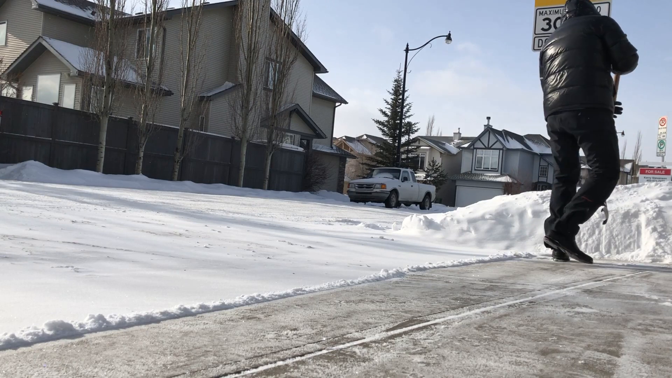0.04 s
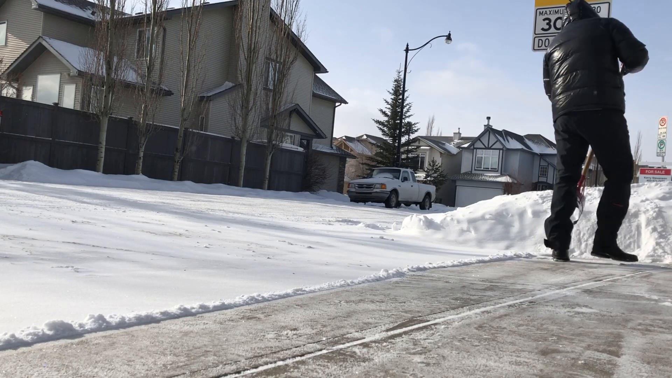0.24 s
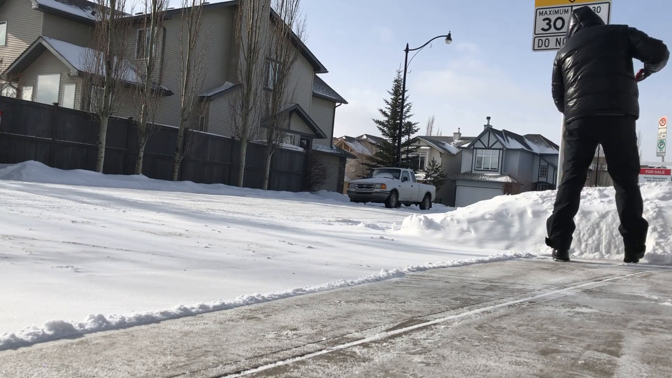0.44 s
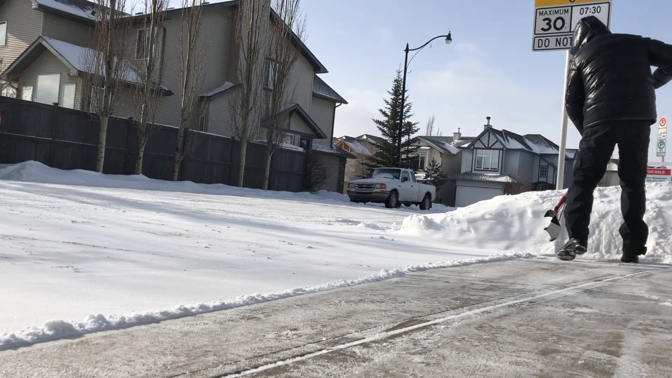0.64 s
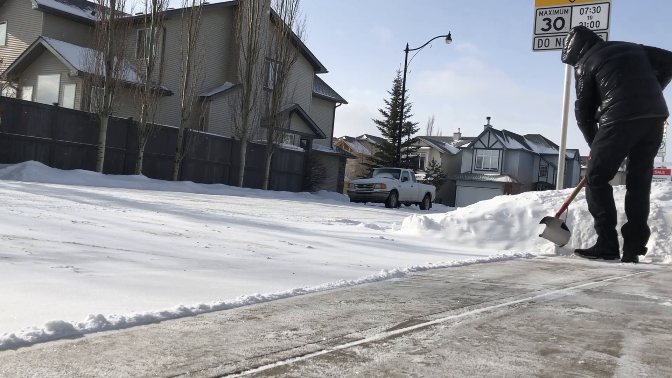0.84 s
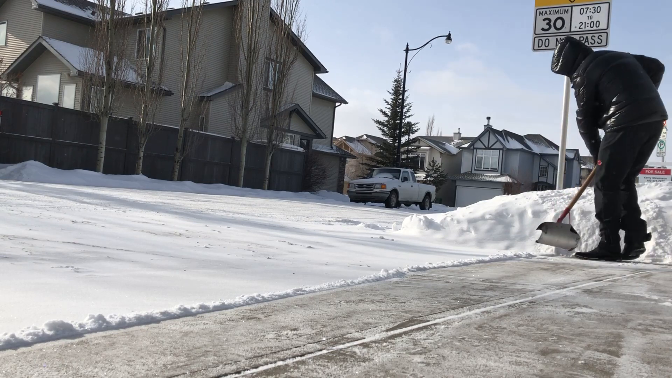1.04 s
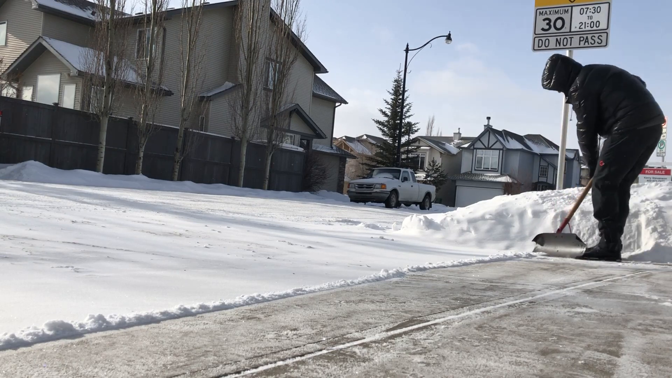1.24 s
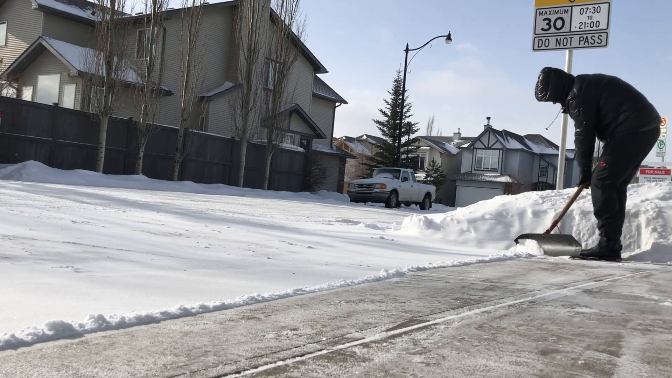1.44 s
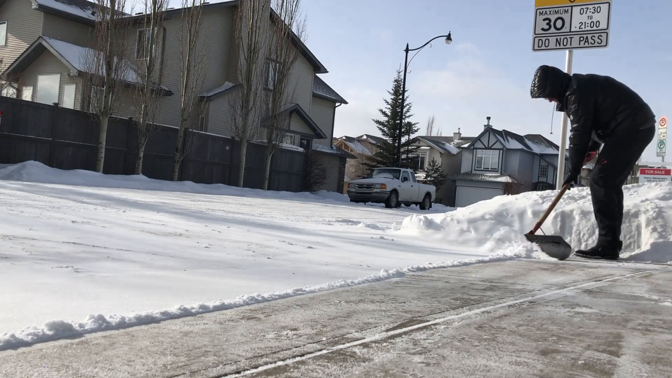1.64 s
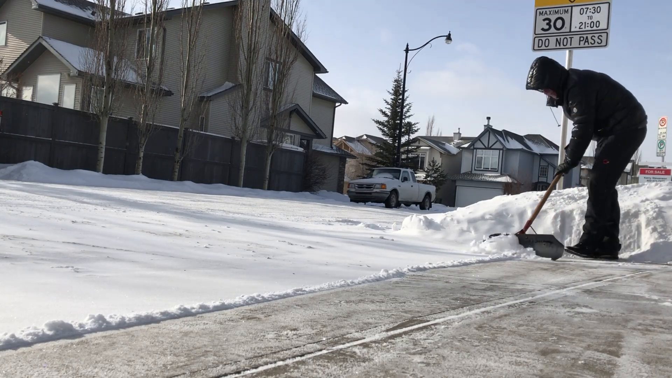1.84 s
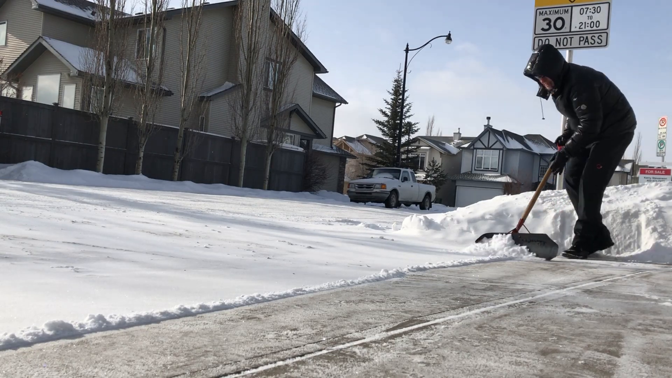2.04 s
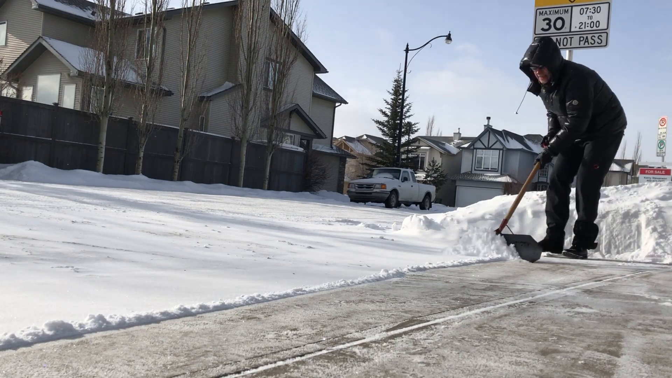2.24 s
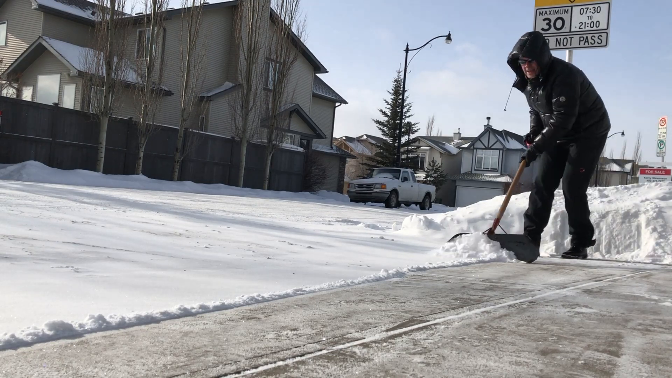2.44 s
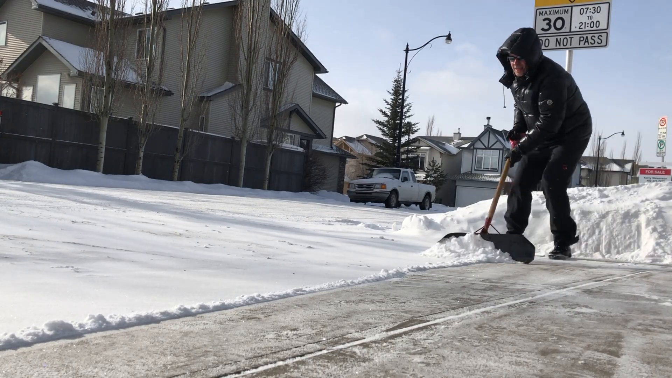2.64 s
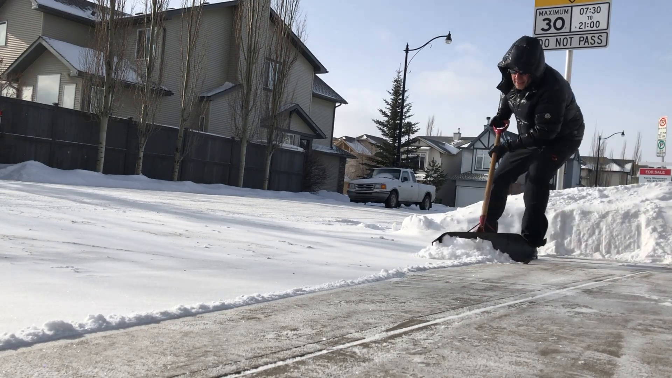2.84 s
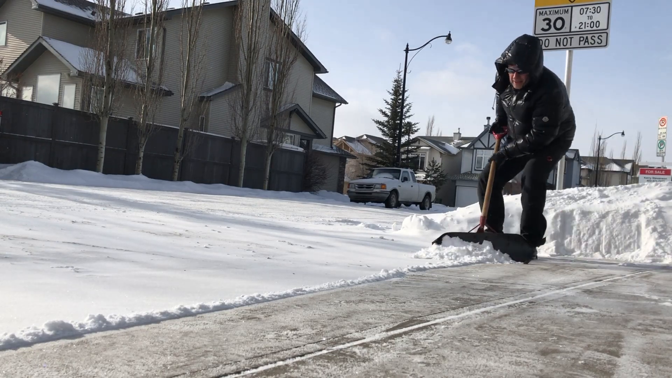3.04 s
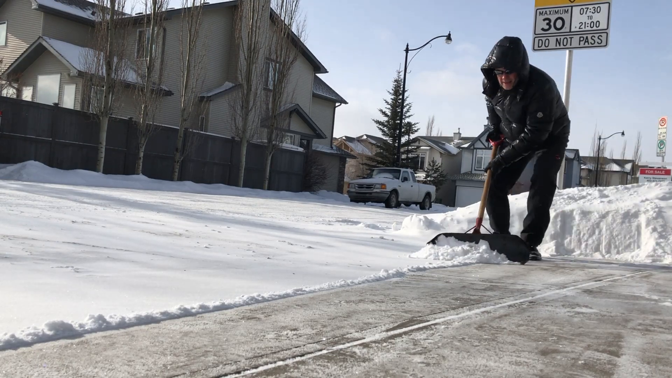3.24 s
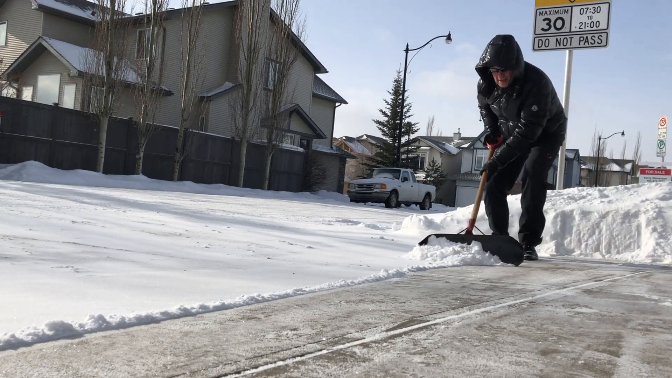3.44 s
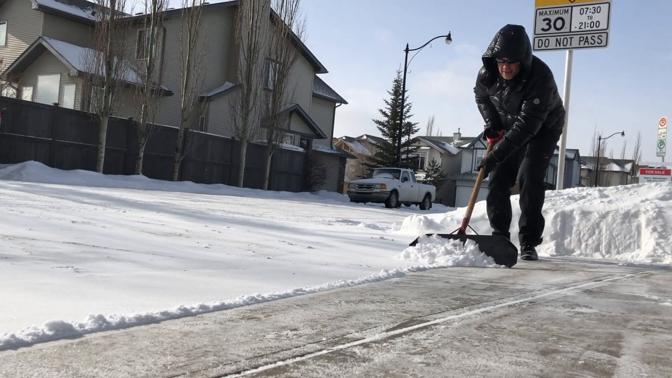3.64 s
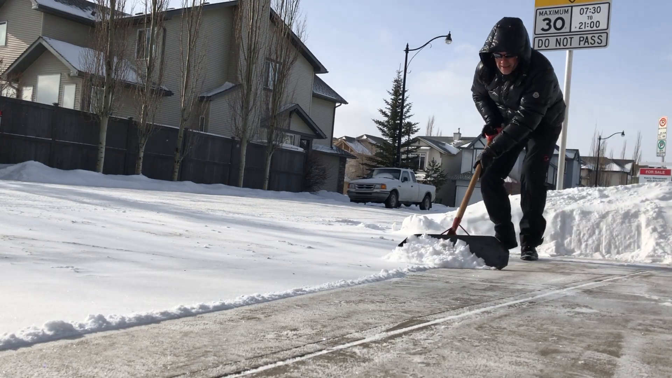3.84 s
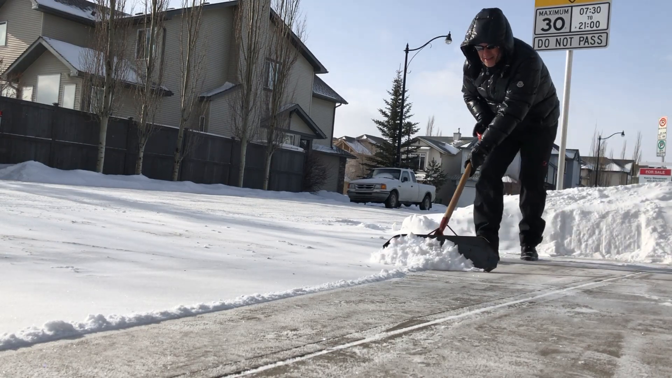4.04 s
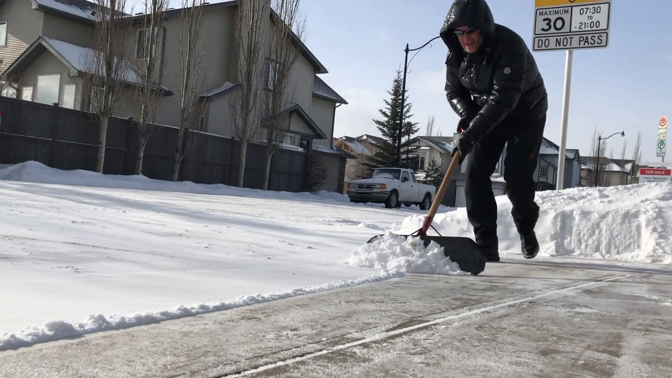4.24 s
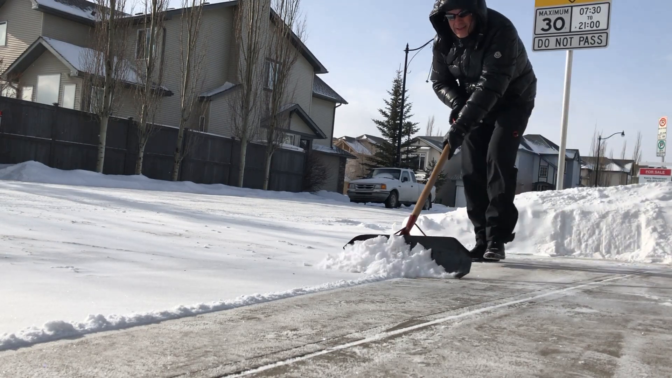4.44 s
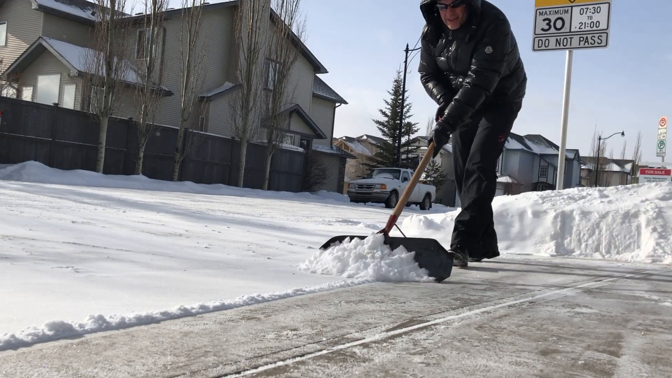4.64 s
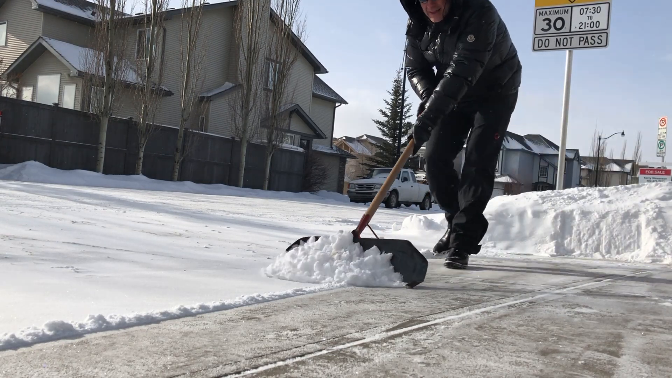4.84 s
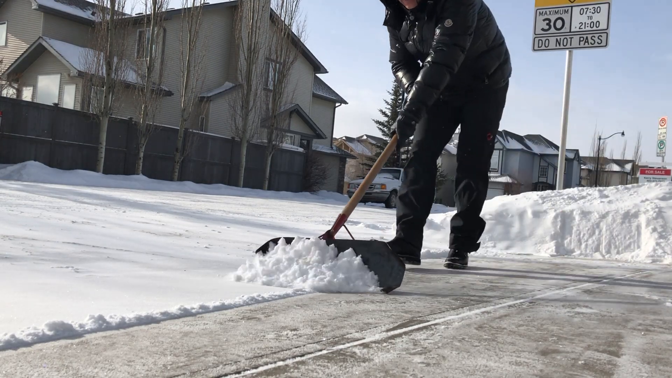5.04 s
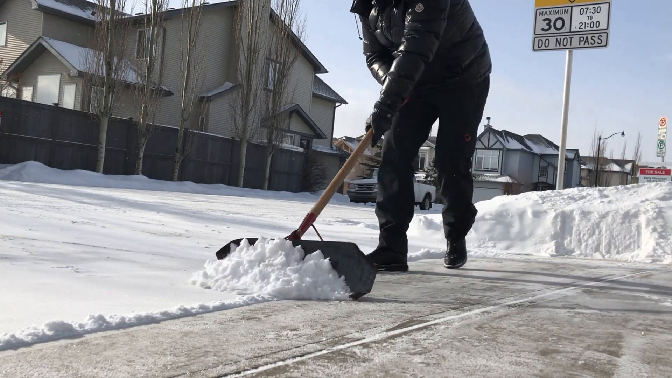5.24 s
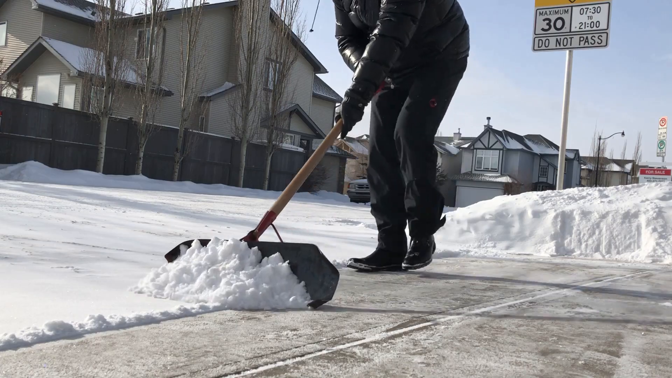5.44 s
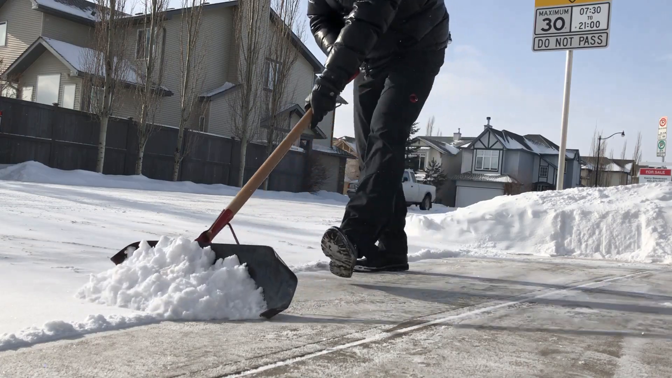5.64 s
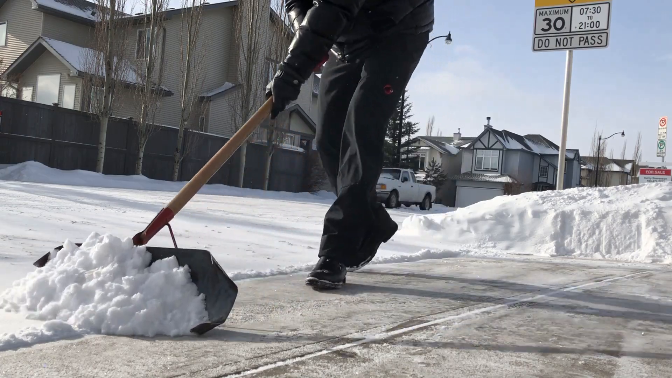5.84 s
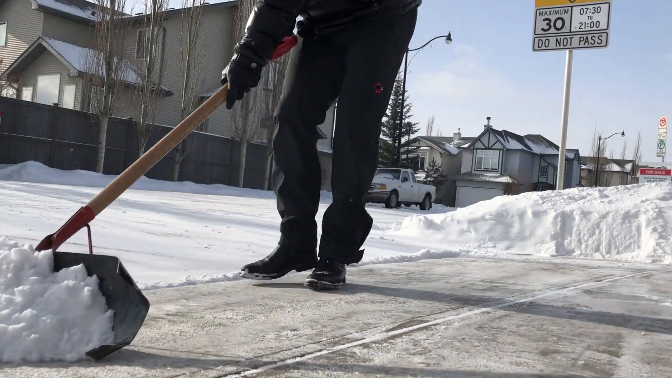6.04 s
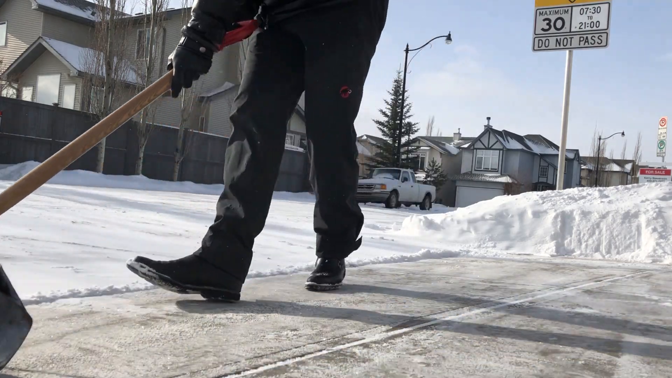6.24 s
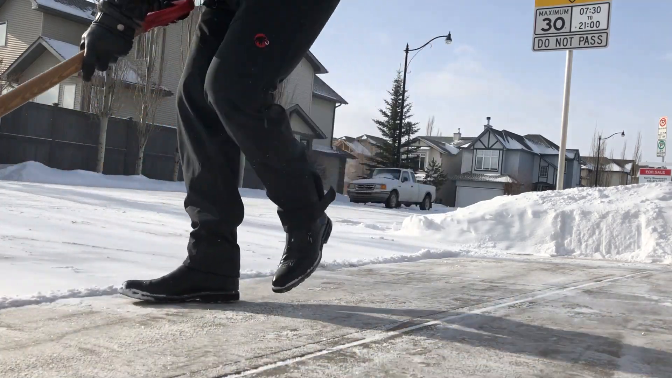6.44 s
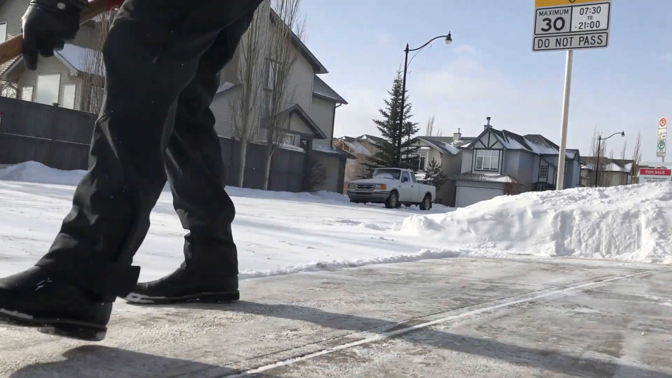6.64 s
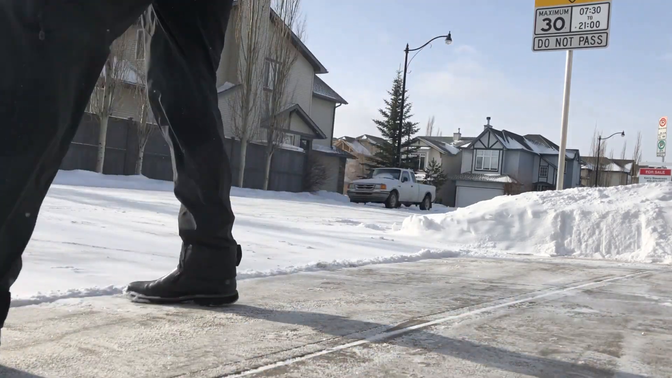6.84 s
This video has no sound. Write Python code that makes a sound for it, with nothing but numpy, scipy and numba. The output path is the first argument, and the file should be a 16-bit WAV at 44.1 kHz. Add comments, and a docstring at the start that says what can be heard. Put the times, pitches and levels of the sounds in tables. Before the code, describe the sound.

A quiet residential street with a very faint low rumble. From 0 to 1.3 seconds, soft boot thuds, brushing snow scuffs and small dry ice ticks. At about 1.4 the shovel is set down with an abrupt scrape and a short, unsteady hollow ring, then rasps over ice, catching on ridges and fading by 2.2. A second, duller push runs from 2.2 to 2.9. A brief break follows, with heavier boot thuds and scuffs around 3.0 to 3.2. From 3.2 a long, juddering, gritty scrape builds, loaded with droning snow; grit snaps at 4.1 and a hard, ringing knock strikes at 4.57. Another push starts near 5.1, growing closer and brighter. At 6.15 a sharp fizzing skid sounds as the blade passes the low microphone. After rough catches and small knocks around 6.65, quickening hops end near 6.9. House fronts return a weak, dull echo.

```python
"""A snow shovel is set down on an icy sidewalk and pushed towards a low microphone, with one short pause.
Its edge sticks and slips on ice and grit: juddering noise that rings the scoop, rasps and fizzes.
It catches on ridges (short noise spells), skids on concrete (gliding resonances), knocks into a joint
(ringing modes) and ends in quickening hops. Boots thud and scuff, ice crumbs tick,
and house fronts return a faint echo over the filtered-noise rumble of a quiet suburb."""
import sys
import numpy as np
from scipy import signal
from scipy.fft import rfft, irfft
from scipy.io import wavfile
from numba import njit

SR = 44100
rng = np.random.default_rng(int(sys.argv[2]) if len(sys.argv) > 2 else 0)


def persist_wave(psi):
    """Save psi, clipped to +-1, as 16-bit WAV."""
    counts = np.round(np.clip(psi, -1, 1) * 32767).astype(np.int16)
    wavfile.write(sys.argv[1], SR, np.atleast_2d(counts).T)


N = 304686
T = np.arange(N) / SR  # time of every sample [s]
TOP_HZ = 15950  # upper limit of the sound


def undb(db):
    """Turn decibels into a gain."""
    return 10 ** (np.asarray(db) / 20)


def unit(x):
    """Scale a signal to a standard deviation of 1."""
    return x / np.std(x)


def curve(rows):
    """Join (time [s], value) points by straight lines."""
    return np.interp(T, *np.transpose(rows))


def swell(start, length):
    """A smooth rise and fall between 0 and 1."""
    return np.sin(np.pi * np.clip((T - start) / length, 0, 1))


def walk(rate):
    """Smooth chance: straight lines between random points, `rate` points a second, spread near 1."""
    knots = rng.standard_normal(8192)
    return 1.2 * np.interp(T * rate, np.arange(len(knots)), knots)


def colour(x, points, size=2048):
    """Filter through (frequency [Hz], level [dB]) points, without echo ahead; white noise keeps its power."""
    hz, db = np.transpose(points)
    f = np.maximum(np.fft.rfftfreq(2 * size, 1 / SR), 1)
    log_gain = np.log(undb(np.interp(np.log(f), np.log(hz), db)))
    # folding the cepstrum forward makes the filter respond as early as it can
    cepstrum = irfft(log_gain)
    cepstrum[1:size] *= 2
    cepstrum[size + 1:] = 0
    response = irfft(np.exp(rfft(cepstrum)))[:size]
    return signal.oaconvolve(x, response / np.linalg.norm(response))[:N]


def resonate(x, hz, width):
    """A fixed resonance, gain 1 at its centre."""
    return signal.lfilter(*signal.iirpeak(hz, hz / width, fs=SR), x)


@njit
def sweep(x, hz, width):
    """State-variable filter with a moving centre: low-pass and band-pass outputs."""
    low, band = np.empty(len(x)), np.empty(len(x))
    band_state, low_state = 0., 0.
    for i in range(len(x)):
        g = np.tan(np.pi * min(hz[i], .45 * SR) / SR)
        k = width / hz[i]
        v = (band_state + g * (x[i] - low_state)) / (1 + g * (g + k))
        low[i] = low_state + g * v
        band[i] = k * v
        band_state = 2 * v - band_state
        low_state = 2 * low[i] - low_state
    return low, band


def grit(rate, spread_db, smooth):
    """Tiny fractures of very unequal size, `rate` a second, over a smooth rub; spread 1."""
    size = undb(spread_db * np.minimum(rng.exponential(size=N), 5))
    cracks = (rng.random(N) < rate / SR) * size * rng.choice([-1, 1], N)
    return unit(unit(cracks) + smooth * rng.standard_normal(N))


def slips(rate=110, relax=0.0018):
    """An edge or sole lets go at uneven moments: each slip jumps up and dies away; spread near 1."""
    jumps = (rng.random(N) < rate / SR) * rng.uniform(0.55, 1, N)
    surge = signal.lfilter([1], [1, -np.exp(-1 / (relax * SR))], jumps)
    return np.minimum(unit(surge - surge.mean()), 3)


def shimmer(x, ring=0.0045, depth=0.5, count=3, size=768):
    """The blade's crowded upper modes colour the sound; the mix shifts as the contact point moves."""
    out = x
    for _ in range(count):
        modes = rng.standard_normal(size) * np.exp(-T[:size] / ring)
        rung = signal.oaconvolve(x, modes / np.linalg.norm(modes))[:N]
        out = out + depth * np.tanh(walk(12)) * rung
    return unit(out) * np.std(x)


# tone of the distant streets: (frequency [Hz], relative level [dB])
SUBURB_TONE = [(25, -33), (45, -2), (90, 0.5), (155, -3), (250, -15.5), (500, -16), (950, -17), (1570, -24),
               (4900, -28.5), (7700, -34), (15500, -37)]
SUBURB_DB = -57.5


def suburb():
    """A faint rumble of distant streets: filtered noise that slowly swells."""
    return undb(SUBURB_DB + 1.8 * walk(1.24)) * colour(rng.standard_normal(N), SUBURB_TONE)


def house_fronts(x, t60=1.0, echo_db=-27):
    """A weak, dull echo of fading noise after 30 ms; the snow swallows the rest."""
    t = T[:SR // 2]
    tail = rng.standard_normal(len(t)) * np.exp(-np.log(1000) * t / t60) * (t > .03)
    tail = signal.lfilter(*signal.butter(1, 3000, fs=SR), tail / np.linalg.norm(tail))
    return undb(echo_db) * signal.oaconvolve(x, tail)[:N]


# crumbs of ice tick underfoot: (time [s], level [dB], pitch [Hz])
CRUMB_TICKS = [(0.026, -40.5, 3120), (.087, -57, 2500), (.564, -53, 3200), (.714, -42.5, 2270),
               (.77, -43.5, 4380), (.838, -51, 990), (.919, -54, 2400), (1.074, -47, 3000),
               (1.133, -44, 2600), (1.32, -52, 2200)]
TICK_DECAY_S, TICK_Q = 0.0043, 1.6  # Q is the sharpness of each of the two filters in a row


def ticks():
    """Each crumb of ice cracks as fading noise in one broad resonance of its own."""
    out, t = np.zeros(N), T[:SR // 10]
    for start, db, hz in CRUMB_TICKS:
        width = hz / TICK_Q
        noise = rng.standard_normal(len(t))
        crack = unit(resonate(resonate(noise, hz, width), hz, width))
        crack = crack * np.exp(-t / TICK_DECAY_S)
        out += undb(db) * np.interp(T - start, t, crack, left=0, right=0)
    return out


# tone of brushed snow: (frequency [Hz], relative level [dB])
SCUFF_TONE = [(100, 5), (350, 2.5), (800, 2.5), (1500, 5), (2300, -1.5), (3300, -2), (4500, -2.5),
              (7000, -12), (9500, -14), (15500, -22)]
# soles and the lifted blade brush the snow: (time [s], level [dB], length [s], treble tilt [dB])
SNOW_SCUFFS = [(0, -51.5, .14, -4), (0.601, -48, .11, 6), (0.624, -46, 0.037, 3), (0.695, -57.5, 0.12, -4),
               (1.027, -55, 0.2, 8), (1.068, -49, 0.032, -9), (1.122, -53, 0.095, 1),
               (1.318, -46, .09, 0.5), (2.974, -54.5, .1, -20), (3.005, -58, 0.2, -5),
               (3.114, -49, 0.15, -13)]


def scuffs(split_hz=1140, slip_db=2.0, creak_hz=2600, creak_width_hz=900, creak_db=0):
    """A brush swells and fades as a spell of fine grit; the cold snow creaks in one broad resonance."""
    force = colour(grit(rate=1600, spread_db=3.0, smooth=0.67), SCUFF_TONE)
    force = force * undb(slip_db * slips(rate=150))
    force = unit(force + undb(creak_db) * resonate(force, creak_hz, creak_width_hz))
    low = signal.lfilter(*signal.butter(1, split_hz, fs=SR), force)
    out = 0
    for start, db, length, tilt_db in SNOW_SCUFFS:
        gain = undb(db) / np.sqrt((1 + undb(2 * tilt_db)) / 2)
        out = out + gain * swell(start, length) * (low + undb(tilt_db) * (force - low))
    return out


# boots land, and at 3.103 s the lifted blade knocks down in the pause: (time [s], level [dB], starting pitch
# [Hz])
BOOT_STEPS = [(0.049, -46, 201), (0.072, -46, 99), (0.491, -48, 104), (0.571, -45, 150), (0.736, -42, 148),
              (2.986, -34.5, 204), (3.103, -36.5, 190), (3.243, -32, 190), (3.47, -44, 80),
              (4.31, -38, 124), (4.585, -31, 95), (4.89, -34, 116), (5.862, -37, 126)]
STEP_DECAY_S = 0.018


def boots(rise=0.0025, sag=0.31, thud_db=3, crush_db=-4, crush_hz=300, crush_s=0.017):
    """Each footfall is a dull thud that sinks in pitch, with the low crunch of packed snow."""
    out = np.zeros(N)
    band = signal.butter(2, [80, crush_hz], "band", fs=SR, output="sos")
    crush = unit(signal.sosfilt(band, rng.standard_normal(N)))
    for start, db, hz in BOOT_STEPS:
        span = slice(int(start * SR), int((start + 10 * crush_s) * SR))
        t = np.maximum(T[span] - start, 0)
        fade = np.exp(-t / STEP_DECAY_S)
        turns = np.cumsum(hz * (1 - sag * (1 - fade))) / SR
        thud = undb(thud_db) * fade * np.sin(2 * np.pi * turns)
        crunch = undb(crush_db) * np.exp(-t / crush_s) * crush[span]
        out[span] += undb(db) * (1 - np.exp(-t / rise)) * (thud + crunch)
    return out


LANDING_S, LANDING_LENGTH_S, LANDING_HZ, LANDING_DB = 1.39, .14, 845, -20


def landing(waver_hz=12, flutter_db=2.0):
    """Set down empty, the scoop sings: friction keeps one mode going unsteadily for a moment."""
    phase = np.cumsum(LANDING_HZ + waver_hz * walk(60)) / SR
    level = undb(LANDING_DB + flutter_db * walk(70))
    return level * swell(LANDING_S, LANDING_LENGTH_S) * np.sin(2 * np.pi * phase)


# ways the scoop can ring: (frequency [Hz], width [Hz], level over the broad response [dB])
RING_MODES = [(188, 25, -13), (271, 15, -9), (378.4, 17, -6), (441.3, 32, -4.5), (717, 31, 0),
              (778, 17, -4), (848, 8.2, 2.5), (925, 11, 0), (1035.5, 44, 1), (1252, 27, 5.5),
              (1448, 20, 7.5), (1532, 20, 2), (1950, 54, -3), (2460, 20, -22), (2610, 17, -11.5),
              (2654, 26, -3.5), (3200, 39, -6), (4590, 27, -9)]
# heavy blows shove the whole scoop: (time [s], peak level [dB], contact time [s])
BLOWS = [(4.570, -3, .0016), (4.574, -12, .0015), (6.635, -17, .003), (6.664, -16, .003),
         (6.888, -24, .004)]


def knocks(t60=0.069):
    """A blow is a short push that flexes the scoop in its modes, damped by the snow."""
    out, t = np.zeros(N), T[:SR // 4]
    ring = sum(undb(db) * np.sin(2 * np.pi * hz * t) / hz for hz, _, db in RING_MODES)
    ring = ring * np.exp(-np.log(1000) * t / t60)
    ring = signal.lfilter(*signal.butter(2, 330, "high", fs=SR), ring)  # slow flexing radiates little
    for start, db, contact in BLOWS:
        push = np.sin(np.pi * np.minimum(t / contact, 1))
        blow = signal.fftconvolve(ring, push)[:len(t)]
        out += undb(db) * np.interp(T - start, t, blow / np.abs(blow).max(), left=0, right=0)
    return out


# four pushes, each a list of: (time [s], push level [dB], bite: edge rasp against scoop [dB])
PUSH_STROKES = [
    [(1.387, -20, -7), (1.46, -21, -5), (1.53, -31, 1.5), (1.59, -29, 1.5), (1.78, -29, -3), (1.87, -37, 6),
     (1.93, -37, -0.5), (2.11, -41, -4), (2.215, -39, 1)],
    [(2.235, -30.5, -1), (2.4, -30.5, 1), (2.6, -34.5, 2.5), (2.8, -34.5, -2), (2.87, -41.5, -2.5),
     (2.99, -39, -8)],
    [(3.212, -46.5, -3.5), (3.33, -29, -6), (3.58, -36.5, -5), (3.8, -32.5, -1.5), (4.1, -31.5, 0),
     (4.2, -28.5, 4), (4.5, -27.5, -2.5), (4.76, -27.5, 2), (5.06, -25, -2.5)],
    [(5.1, -30.5, 0), (5.35, -27.5, -2.5), (5.66, -28, -4.5), (5.9, -26, -2), (6.4, -31.5, 3),
     (6.55, -30.5, -2), (6.62, -22, 2), (6.69, -27.5, 2.5)],
]
# how fast each push dies away, one value a push: (fade time [s])
PUSH_FADES = [0.086, 0.025, 0.075, 0.031]
PUSH_ATTACK_S = .003


def effort():
    """Each push starts abruptly, follows its effort and dies away when the arms ease off."""
    out = np.zeros(N)
    for rows, release_s in zip(PUSH_STROKES, PUSH_FADES):
        times, db, _ = np.transpose(rows)
        attack = np.clip((T - times[0]) / PUSH_ATTACK_S + 1, 0, 1)
        release = np.exp(-np.maximum(T - times[-1], 0) / release_s)
        out = np.maximum(out, attack * release * undb(np.interp(T, times, db)))
    return out


# the edge skates over bare concrete: (time [s], level [dB], rise [s], hold [s], fall [s],
# upper resonance [Hz], glide [octaves per s])
CONCRETE_SKIDS = [(1.425, -31, 0.042, 0.019, .06, 7900, 2.5), (1.517, -35, 0.025, .05, .03, 10100, 2),
                  (5.986, -29.5, 0.078, 0.07, .09, 13300, -2.5),
                  (6.152, -17, 0.0017, .05, 0.036, 10900, 0.6), (6.36, -28, 0.088, 0.033, 0.17, 9700, -0.7)]
SKID_NEEDS_DB = -33  # below this push level the skid gets quieter
SKID_SLIP_DB = 2.4


def skate():
    """On bare concrete the edge sings in two broad resonances; the upper one glides with the blade angle."""
    force = shimmer(grit(rate=3800, spread_db=3.5, smooth=0.72), ring=0.0068, depth=0.99)
    force = force * undb(SKID_SLIP_DB * slips())
    edge = unit(resonate(resonate(force, 8150, 3100), 5840, 4700))
    out = 0
    for start, db, rise, hold, fall, hz, octaves_per_s in CONCRETE_SKIDS:
        t = T - start
        shape = np.exp(np.minimum(t, 0) / rise - np.maximum(t - hold, 0) / fall)
        centre = np.clip(hz * 2 ** (octaves_per_s * t), hz / 2, TOP_HZ)
        _, band = sweep(force, centre, 2300.0)
        out = out + undb(db) * shape * (0.69 * edge + 0.5 * unit(band))
    return out * np.minimum(effort() / undb(SKID_NEEDS_DB), 1)


# the blade hops to the end of the last push, each hop sooner, shorter and weaker
HOP_START_S, HOP_GAP_S, HOP_GAP_RATIO = 6.731, .066, .8
HOP_DB, HOP_LOSS_DB, HOP_CONTACT_S, HOP_CONTACT_RATIO, HOP_TILT_DB = -23, .8, 0.024, 0.51, 8
DRAG_DB, DRAG_S = -38, 0.14  # it still drags lightly through the first hops


def hops(count=4):
    """The contacts of the hopping blade, as rows like those of the catches."""
    rows = [(HOP_START_S - HOP_GAP_S / 2, DRAG_DB, DRAG_S, HOP_TILT_DB)]
    start = HOP_START_S
    for k in range(count):
        contact = HOP_CONTACT_S * HOP_CONTACT_RATIO ** k
        rows.append((start, HOP_DB - k * HOP_LOSS_DB, contact, HOP_TILT_DB))
        start += HOP_GAP_S * HOP_GAP_RATIO ** k
    return rows


# lesser ridges, at most as loud as the push
RIDGES_PER_S, RIDGE_LOUDEST_DB, RIDGE_SCATTER_DB, RIDGE_S = 9, 0, 0.5, 0.0065


def ridges(count=90):
    """Lesser ridges come at random moments, nearly as strong as the push that meets them."""
    push, rows, start = effort(), [], PUSH_STROKES[0][0][0]
    for gap, strength, tilt in rng.uniform(-1, 1, (count, 3)):
        start += (1 + gap) / RIDGES_PER_S
        if start < HOP_START_S:
            push_db = 20 * np.log10(push[int(start * SR)] + 1e-9)
            db = push_db + RIDGE_LOUDEST_DB - RIDGE_SCATTER_DB * abs(strength)
            rows.append((start, db, RIDGE_S, 6 * tilt))
    return rows


def bursts(rows, rise, fall, split_hz, grains=5000):
    """Short spells of crushed grit; the tilt lifts their treble."""
    bass, treble = np.zeros(N), np.zeros(N)
    for start, db, length, tilt_db in rows:
        span = slice(max(int(start * SR), 0), int((start + length + 10 * fall) * SR))
        t = np.maximum(T[span] - start, 0)
        shape = (1 - np.exp(-t / rise)) * np.exp(-np.maximum(t - length, 0) / fall)
        shape = shape * undb(db) / np.sqrt((1 + undb(2 * tilt_db)) / 2)
        bass[span] += shape
        treble[span] += shape * undb(tilt_db)
    force = grit(rate=grains, spread_db=4.5, smooth=0.53)
    low = signal.lfilter(*signal.butter(1, split_hz, fs=SR), force)
    return low * bass + (force - low) * treble


# tone of crushed ice: (frequency [Hz], relative level [dB])
CATCH_TONE = [(80, -40), (200, -5), (400, 6), (650, 4.5), (900, 4), (1450, -1.5), (1700, -3.5), (3000, -3),
              (4200, -6.5), (6000, -10.5), (10000, -15), (15500, -20)]
# the edge catches on a ridge: (time [s], level [dB], length [s], treble tilt [dB])
RIDGE_CATCHES = [(1.381, -17, 0.0025, -4), (1.399, -24, 0.0052, 6), (1.436, -16.5, 0.0058, -4),
                 (1.578, -22.5, .014, 17), (1.659, -20.5, 0.0085, 10), (1.721, -18, 0.013, 2.5),
                 (1.758, -24, 0.021, -5), (1.922, -27, 0.0081, -4), (2.000, -29, 0.029, 16),
                 (2.304, -23, 0.016, 1), (2.476, -23, 0.0065, 4), (3.102, -39, 0.007, -7),
                 (3.21, -42, 0.0067, 5), (4.149, -18, 0.015, 8), (4.289, -17.5, 0.0052, 14),
                 (4.57, -12, 0.011, -17), (4.590, -18, 0.023, -17), (4.723, -22.5, 0.025, 10),
                 (5.005, -23.5, 0.024, 8), (5.042, -18.5, .007, 4), (5.9, -26, .03, -14),
                 (6.621, -23, 0.032, 13), (6.663, -17, 0.0088, 20)]
# a grain of grit snaps under the edge: (time [s], level [dB])
GRIT_SNAPS = [(2.974, -30.5), (3.252, -32), (4.129, -17), (4.889, -23), (5.627, -21), (5.688, -21.5),
              (5.75, -19.5), (6.124, -22), (6.153, -20.5)]
SNAP_S, SNAP_TILT_DB, CATCH_SHIMMER = .004, 24, .6


def catches():
    """Ridges, snapping grit and hops each crush a short spell of ice under the edge."""
    snaps = [(start, db, SNAP_S, SNAP_TILT_DB) for start, db in GRIT_SNAPS]
    rows = RIDGE_CATCHES + ridges() + snaps + hops()
    crush = bursts(rows, rise=0.00085, fall=0.0041, split_hz=1300)
    return colour(shimmer(crush, depth=CATCH_SHIMMER), CATCH_TONE)


# while nearly empty the scoop has hollows between its modes: (frequency [Hz], width [Hz], depth [0-1])
EMPTY_HOLLOWS = [(708, 150, 0.64), (1686, 99, 1), (2920, 580, 0.3)]
FILLS_S, FILL_TIME_S = 2.4, .25  # middle and pace of the filling


def hollow(x):
    """The hollows, cut out of the scoop's sound, close as snow fills the scoop."""
    empty = (1 - np.tanh((T - FILLS_S) / FILL_TIME_S)) / 2
    for hz, width, depth in EMPTY_HOLLOWS:
        x = x - empty * min(depth, 1) * resonate(x, hz, width)
    return x


# snow heaped in the scoop makes it drone: (time [s], drone against scoop [dB])
SNOW_LOAD = [(1.45, -5.5), (1.8, -3.5), (2.5, -2), (2.9, 4), (3.6, 1.5), (4.3, -2.5), (6.6, 2.5)]


def scoop(force, wander_db=4, damping=0.76):
    """The scoop rings, freest when empty; each mode swells and fades as the contact moves along the edge."""
    free_db = -damping * (curve(SNOW_LOAD) + 3)
    rings = 0
    for hz, width, db in RING_MODES:
        upper = hz > 600  # snow damps only the upper modes
        gain = undb(db + wander_db * np.tanh(walk(7.0)) + free_db * upper)
        rings = rings + gain * resonate(force, hz, width)
    return undb(-1.5) * (force + rings)


# the blade angle sets where the rasp ends: (time [s], corner [Hz])
BLADE_ANGLE = [(1.4, 5560), (2.35, 4880), (2.8, 4180), (4.2, 3840), (5.5, 5500), (6.1, 6140), (6.4, 4320)]
# tones of scoop, edge, breaking ice and heaped snow, each: (frequency [Hz], relative level [dB])
SCOOP_TONE = [(200, -47.5), (430, -11.5), (600, 6), (900, 4.5), (1350, 1.5), (1520, -4), (1700, -1.5),
              (2300, -40.5), (5000, -64)]
RASP_TONE = [(700, -29), (1400, -12.5), (1850, 2), (2300, 1), (3000, -0.5), (4000, -1), (6000, -3),
             (12000, 3)]
FIZZ_TONE = [(2500, -17.5), (4500, 11), (6300, 7), (8000, 6.5), (10500, 1), (13000, 4.5), (15500, 0)]
SNOW_TONE = [(35, -33.5), (70, -25.5), (130, -13.5), (200, -9.5), (280, -5.5), (390, 3), (500, 1.5),
             (650, -17), (1200, -34)]
FIZZ_DB, FIZZ_PER_BITE = -6.5, 0.76  # breaking ice; it follows the bite of the edge
PASSES_S, APPROACH_S, NEAR_FIZZ_DB = 6.19, 0.4, 9.5  # the fizz gains level while the blade is close
DIGS_IN_S, DIG_TIME_S, SKIM_FIZZ_DB = 1.53, .03, -22  # at first the edge only skims and breaks little ice
CORNER_DB, CORNER_PER_LOAD = -13.5, 1  # the resonance at the rasp's corner grows with the load


def scrape(slip_db=2.0, judder_db=0.79, flicker_db=1.5):
    """The sliding edge sticks and slips: one juddering pressure drives scoop, snow, edge and breaking ice."""
    bite_db = curve([(time, bite) for rows in PUSH_STROKES for time, _, bite in rows])
    corner, heap_db = curve(BLADE_ANGLE), curve(SNOW_LOAD)
    nearness = 1 / (1 + ((T - PASSES_S) / APPROACH_S) ** 4)
    skims = (1 - np.tanh((T - DIGS_IN_S) / DIG_TIME_S)) / 2
    fizz_db = FIZZ_DB + FIZZ_PER_BITE * bite_db + NEAR_FIZZ_DB * nearness + SKIM_FIZZ_DB * skims

    pressure = undb(slip_db * slips() + judder_db * walk(60))
    force = unit(grit(rate=3000, spread_db=2.0, smooth=0.96) * pressure)
    body = colour(force, SCOOP_TONE) + undb(heap_db - 2.0) * colour(force, SNOW_TONE)
    crunch = shimmer(force)

    # two low-passes end the rasp at the corner, and a narrower peak stands there
    low, _ = sweep(colour(crunch, RASP_TONE), corner, 4040.0)
    low, _ = sweep(low, corner, 4040.0)
    _, peak = sweep(low, corner, 810.0)
    rasp = unit(low + 2 * undb(CORNER_DB + CORNER_PER_LOAD * heap_db) * peak)
    rasp = rasp * undb(flicker_db * walk(35))
    fizz = unit(colour(crunch, FIZZ_TONE)) * undb(flicker_db * walk(35))
    return effort() * (undb(-1.0) * body + undb(bite_db + 0.58) * rasp + undb(fizz_db) * fizz)


def scene():
    """Shovel and boots in the open street, with the echo and the suburb behind."""
    shovel = hollow(scoop(scrape() + catches())) + landing() + skate() + knocks()
    near = shovel + boots() + scuffs() + ticks()
    return (near + house_fronts(near) + suburb())[None]


def record(dry):
    """Round off the highest peaks and cut what lies above the top frequency."""
    rounded = np.tanh(.6 * dry) / .6
    return signal.sosfiltfilt(signal.ellip(8, .05, 60, TOP_HZ, fs=SR, output="sos"), rounded)


dry = scene()
out = record(dry)
persist_wave(out)
```